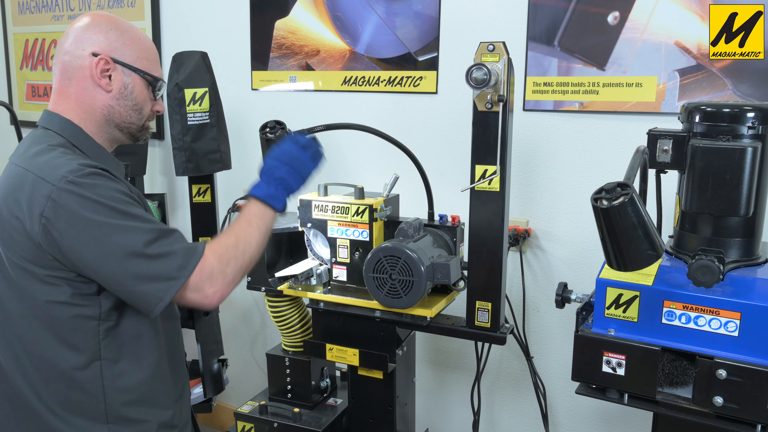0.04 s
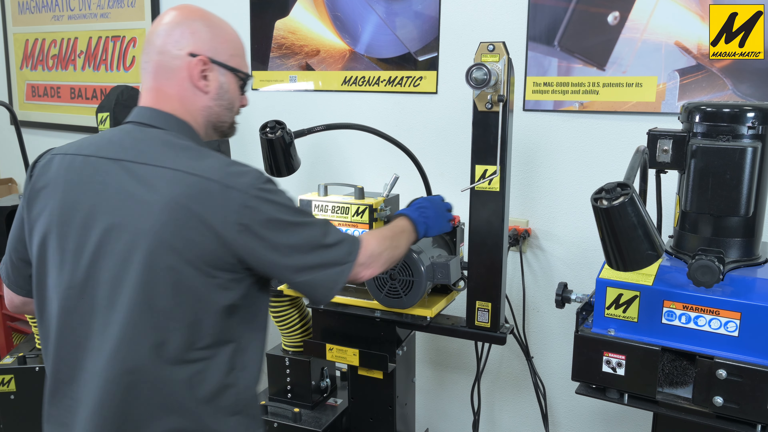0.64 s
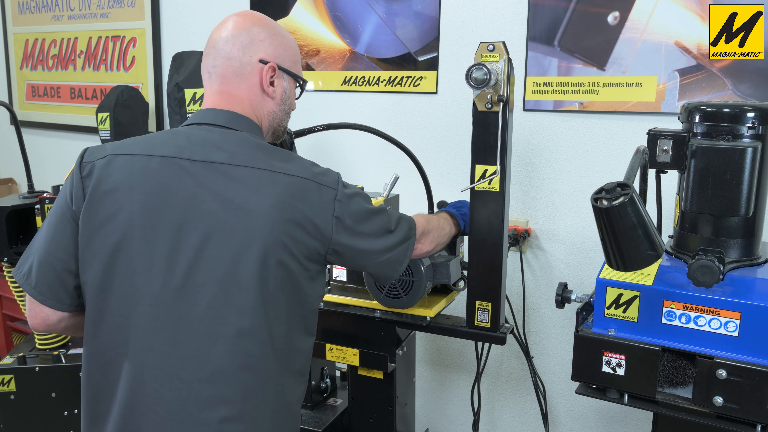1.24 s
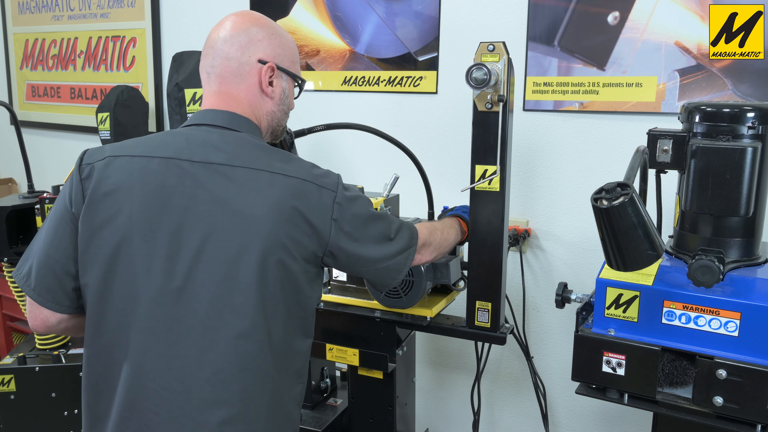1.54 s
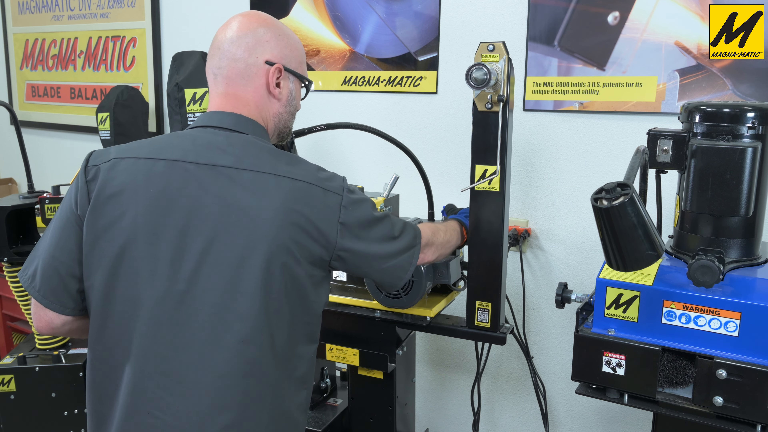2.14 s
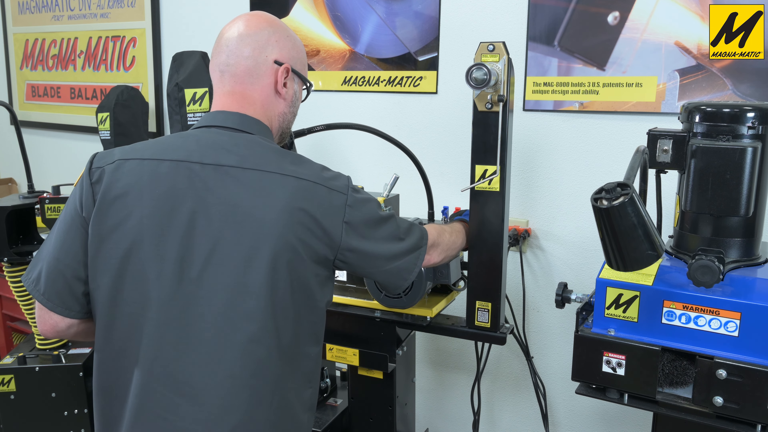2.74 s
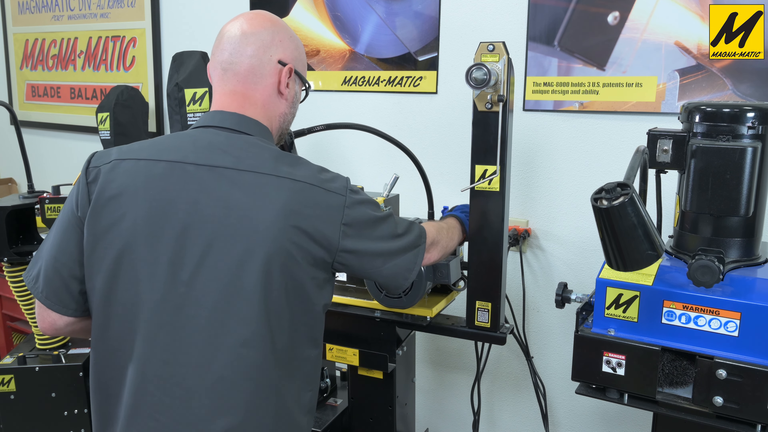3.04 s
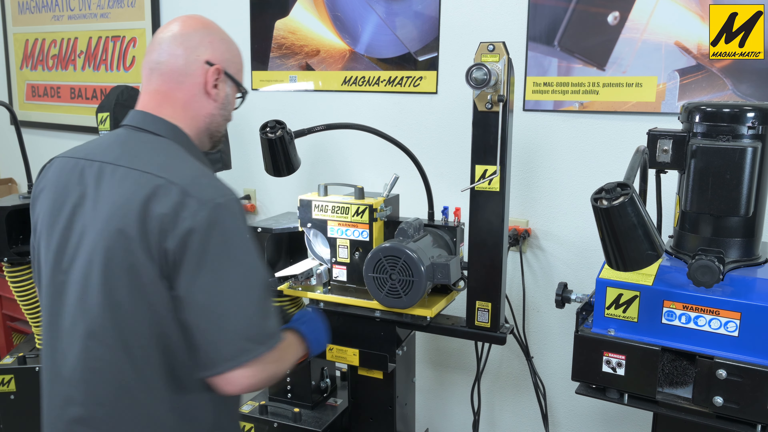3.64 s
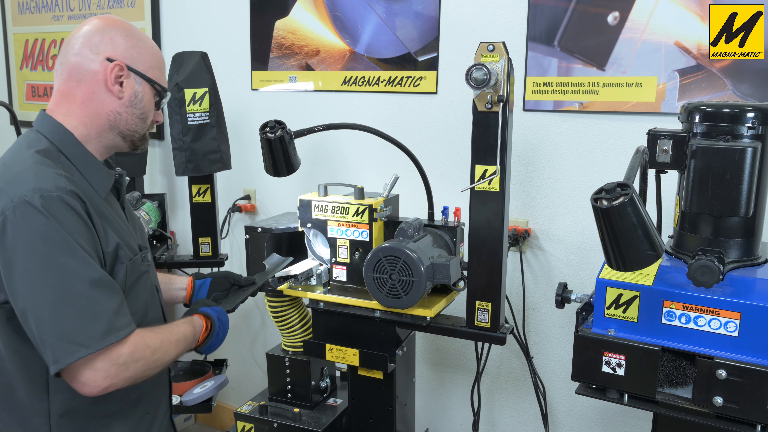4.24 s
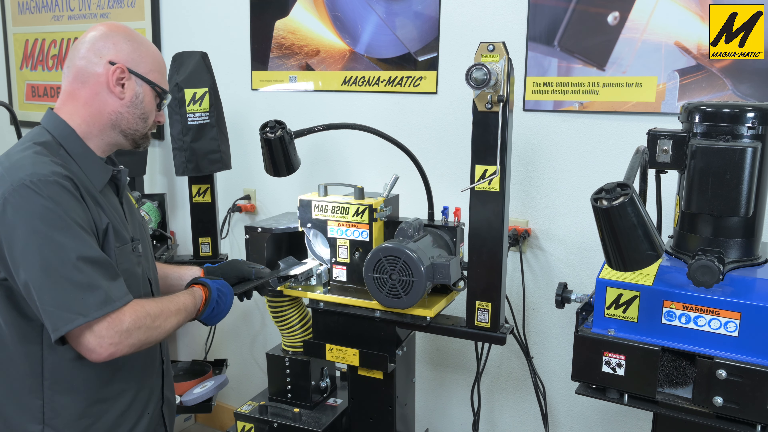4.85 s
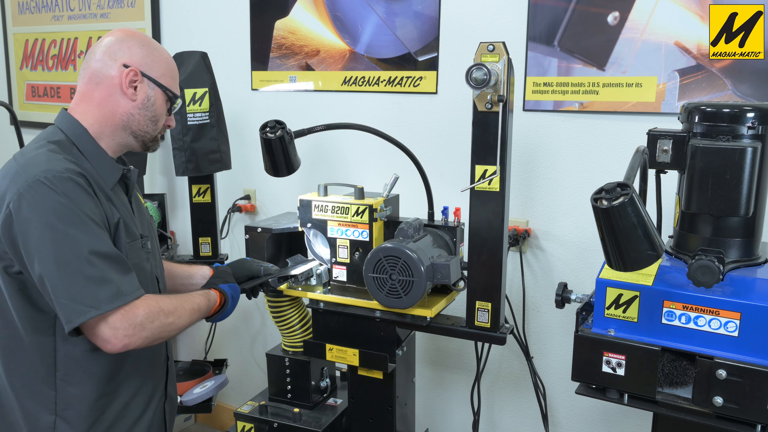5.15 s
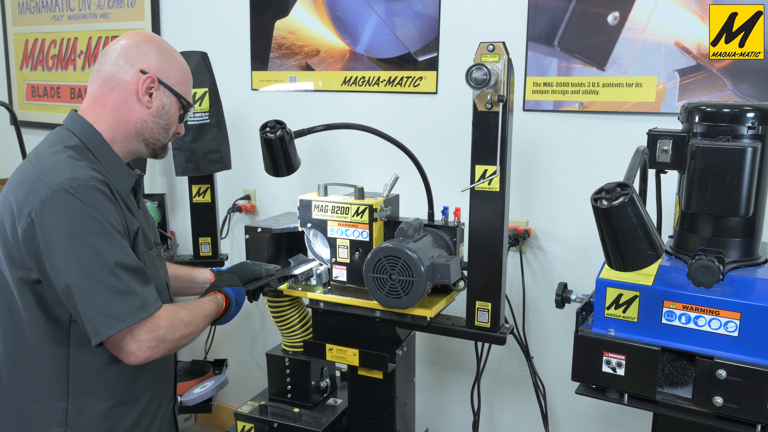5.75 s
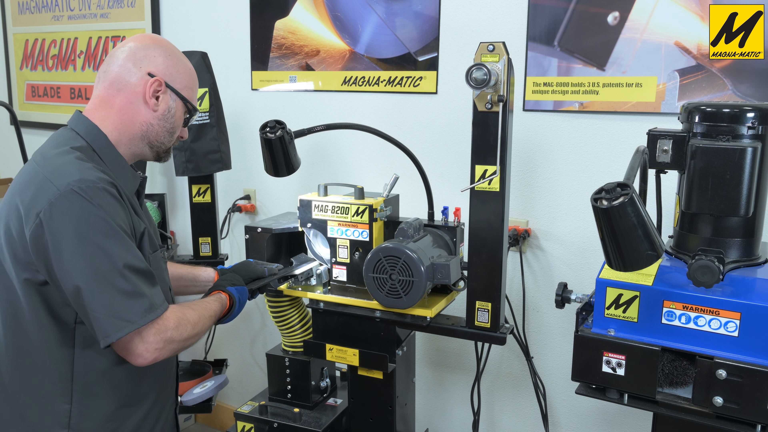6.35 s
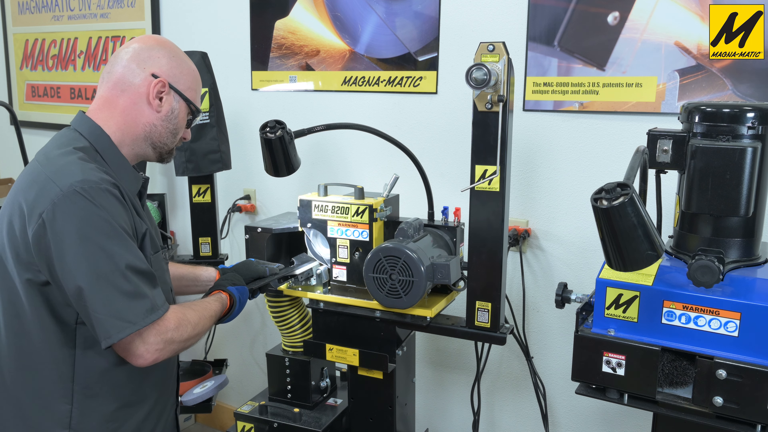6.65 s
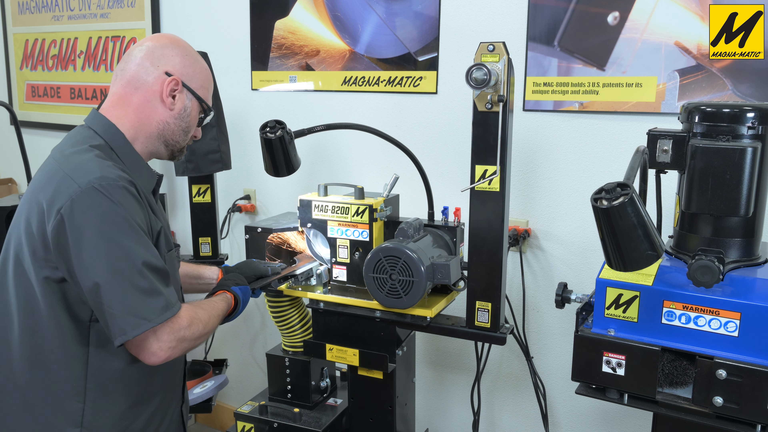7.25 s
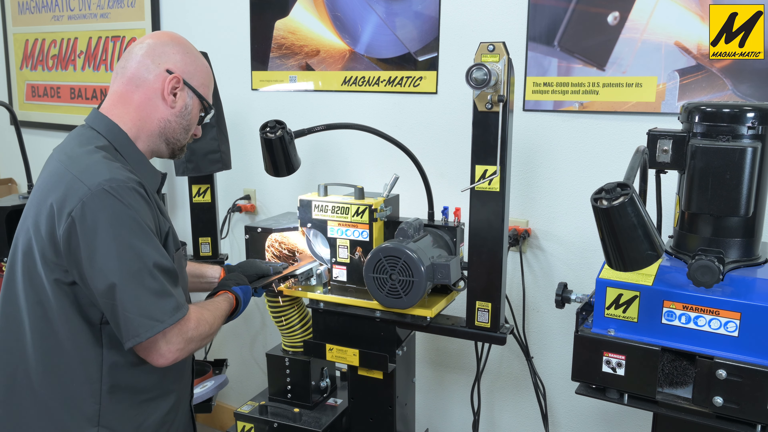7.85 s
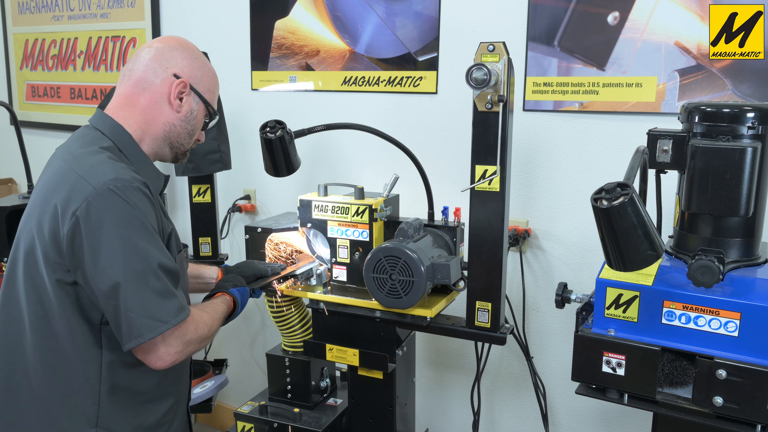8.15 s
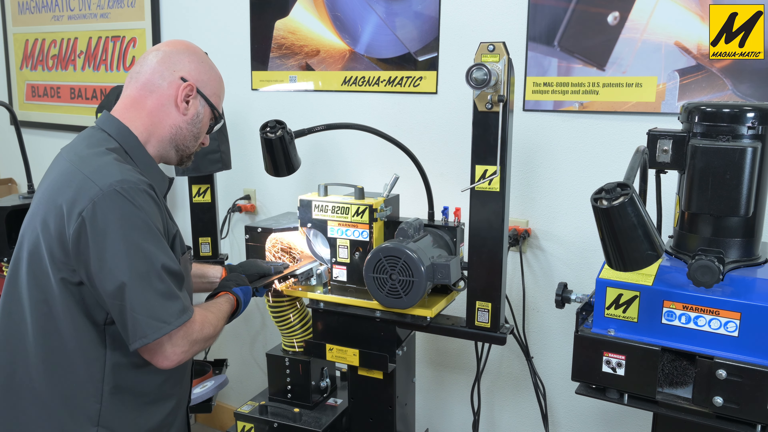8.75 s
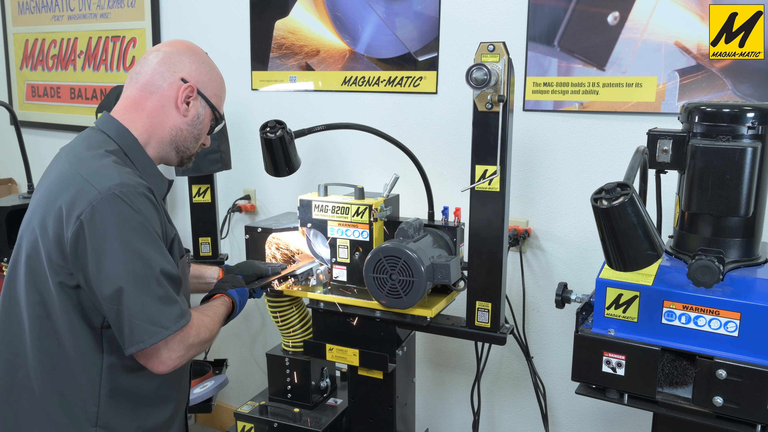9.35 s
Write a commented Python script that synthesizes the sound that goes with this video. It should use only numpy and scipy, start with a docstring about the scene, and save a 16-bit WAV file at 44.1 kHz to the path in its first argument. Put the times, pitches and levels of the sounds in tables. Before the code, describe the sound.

In a workshop, clothes rustle faintly, a shoe scuffs and a steel frame is lightly knocked. A switch clicks and a dust blower winds up with rushing air and a rising hum. A second click starts a belt grinder, which whirs and rattles. A steel blade skips on the belt, then bites with a loud, ringing hiss as the motor slows slightly. One fixed mono microphone hears it all.

```python
"""Clothes rustle and a sole scuffs as a man steps up to a belt grinder; one fixed mono mic in a workshop.
Knocks ring the steel frame and two switches click. A dust blower winds up, fan tones over rushing air,
then the grinder: its wheel and belt rattle in repeating loops and the two motors beat.
A steel blade first skips on the turning belt, then bites: the grit hisses, the blade rings,
the motor slows."""
import sys
import numpy as np
from scipy import signal
from scipy.fft import rfft, irfft, next_fast_len
from scipy.io import wavfile
from scipy.ndimage import uniform_filter1d, map_coordinates

SR = 44100
rng = np.random.default_rng(int(sys.argv[2]) if len(sys.argv) > 2 else 0)


def wav_record(signal):
    """Record a signal, one row per channel, as 16-bit PCM in the file named by sys.argv[1]."""
    frames = np.transpose(np.atleast_2d(signal))
    bounded = np.clip(frames, -1, 1)
    # unit amplitude maps onto the largest positive 16-bit level
    quanta = np.round(bounded * 32767).astype(np.int16)
    wavfile.write(sys.argv[1], SR, quanta)


N = 418509

# the still workshop at the mic: (frequency [Hz], level [dB])
ROOM_COLOUR = [(30, -24), (150, -11), (350, -4), (700, -18), (1500, -16), (5000, -18), (9500, -23),
               (15000, -31)]
# arm and body movements: (middle [s], half-length [s], folds [dB], swish [dB])
BODY_MOVES = [(0.123, 0.2, -64, -64.5), (0.62, 0.25, -68, -74), (0.94, 0.35, -72, -78),
              (1.504, 0.17, -71, -80)]
# cloth folding: (frequency [Hz], level [dB])
FOLD_COLOUR = [(29, -46), (50, -19), (93, -5), (316, 1.5), (501, -2.5), (612, -4.5), (895, -9), (1340, -10),
               (1540, -11.5), (6000, -25.5), (7800, -50), (13200, -120)]
# cloth swishing: (frequency [Hz], level [dB])
SWISH_COLOUR = [(1180, -29), (2000, -5), (2900, -5), (4630, -3), (10800, -5.5), (13900, -1.5),
                (15800, -5.5)]
# a shoe slides on the floor: (start [s], length [s], level [dB])
SHOE_SCUFFS = [(.56, 0.27, -78), (.78, 0.078, -56.5), (.89, 0.096, -66.5)]
# the sliding sole: (frequency [Hz], level [dB])
SOLE_COLOUR = [(180, -31), (300, -9), (323, -4), (439, -2), (572, -2), (643, -8), (985, -5.5), (2270, -1.5),
               (10000, -26.5), (13000, -56), (22000, -120)]
HUSH_S = 1.7  # rustle and frame ring stop short before the first switch

# ticks, knocks and switch clicks: (time [s], crack [dB], decay [s], brightness [Hz], frame ring [dB],
# low cut [Hz], place [0 frame to 1 switch box], ping of the struck part [Hz], ping [dB])
STRIKES = [(0.339, -59, 0.006, 1500, -80, 250, 0.1, 900, -64),
           (0.376, -65, 0.0035, 12000, -97, 250, 0.41, 350, -57),
           (0.465, -57, .008, 900, -95, 200, 0, 330, -59), (0.553, -57, .002, 4000, -87, 250, 0, 350, -55),
           (1.322, -57.5, 0.017, 7000, -84, 330, 0.084, 2670, -62),
           (1.333, -46, 0.013, 6000, -73, 335, 0.11, 2600, -44),
           (1.342, -60, 0.0038, 2600, -52, 258, 0.045, 2570, -44),
           (1.812, -36, 0.013, 7000, -57, 437, 1, 5080, -33.5),
           (2.466, -77, .002, 12000, -100, 1500, 1, 5080, -88),
           (2.8721, -38.5, 0.01, 8000, -74, 1190, 0.88, 3110, -38),
           (2.877, -47, 0.002, 5030, -60, 1200, 0.95, 3950, -44)]
# the crack of a strike: (frequency [Hz], level [dB])
CRACK_COLOUR = [(120, -37), (200, 2.5), (607, -15.5), (1430, -7), (1640, -15), (1900, -8), (2250, -14),
                (3120, -10), (3500, -15), (3850, -9), (4600, -12), (5110, -11), (5750, -10), (6900, -19.5),
                (14200, -23), (15500, -35.5)]
# steel frame: (frequency [Hz], struck on the frame [dB], struck at the switch box [dB], t60 [s])
FRAME_MODES = [(290, -9.5, 5, 0.47), (358, -10, -1, 0.9), (417, -0.5, -15, 0.66), (510, 1.5, 8, 0.23),
               (616, -16, 1, 0.4), (1350, -7, 3, 1), (1413, 2, 21, 0.066), (1880, 3, -8, 0.26),
               (2080, 18, -7, 0.1), (2620, 11, 2, 0.26), (3150, -11, -12, 0.9), (3677, -6, -2, .2),
               (4091, -3, -16, 0.23), (4888, -15, -1.5, .47), (5670, -10, 1, .4)]

BLOWER_ON_S, GRINDER_ON_S, IN_STEP_S = 1.81, 2.87, 5.35
# the blower winds up: (time [s], fan blades passing [Hz])
BLADE_PASS_RATE = [(1.81, 0), (2.05, 12), (2.4, 65), (2.6, 95), (2.8, 122), (2.94, 137), (3.18, 161),
                   (3.46, 185), (3.76, 206), (4.2, 231), (4.55, 235.3), (9.49, 235.3)]
# the duct lifts or swallows the fan's tones: (frequency [Hz], half-width [Hz], gain [dB])
DUCT_BANDS = [(172, 42, 6.5), (205.5, 7.7, 11), (218, 13, -8.5), (388, 7.8, -22), (445.4, 14.4, -7)]
# air rushing through the duct: (frequency [Hz], level [dB])
RUSH_COLOUR = [(29, -70), (50, -40), (182, -9.5), (210, -3.5), (230, -8.5), (276, -2.5), (326, 0),
               (406, -10.5), (451, -5.5), (475, 3), (520, -5.5), (576, 0), (746, -19), (1040, -22),
               (1100, -20.5), (1430, -40), (2420, -120)]
# blower housing: (frequency [Hz], width [Hz], level [dB])
HOUSING_MODES = [(1060, 176, 15), (1750, 330, -1.5), (2910, 120, -1), (3300, 250, -0.5)]
# rotor slots whine as the blower starts: (time [s], pitch [Hz])
SLOT_PITCH = [(1.81, 100), (2.3, 1050), (2.55, 1600), (2.7, 1900), (2.85, 2100), (2.95, 2150)]

# the grinder's motor winds up, then slows under load: (time [s], speed [turns/s])
GRINDER_SPEED = [(2.87, 0), (3.2, 29), (3.5, 48), (3.8, 59.2), (7.0, 59.2), (7.25, 58.65), (8.1, 58.2),
                 (9.49, 58.0)]
WHEEL_PER_MOTOR, WHEEL_TURNS_PER_BELT = 0.7758, 17
# the belt drags on its way up to speed: (frequency [Hz], level [dB])
DRAG_COLOUR = [(500, 7.5), (1000, 1), (1500, -4), (2400, -1), (3300, 6), (4300, -5.5), (6000, -13),
               (7200, -15), (9500, -14), (14500, -41)]
# the belt running: (frequency [Hz], level [dB])
RUN_COLOUR = [(410, -7), (700, -6), (957, -9), (1290, -8), (1610, -7), (2230, -12), (3060, -2.5),
              (3620, -8), (4290, -10.5), (6770, -12), (10300, -24.5), (12800, -25), (13800, -17.5),
              (14800, -27), (15800, -33)]
# wheel guard: (frequency [Hz], width [Hz], level [dB])
GUARD_MODES = [(1316, 110, -10), (1625, 17, -6), (2613, 25, 1), (2828, 5.3, 3), (3030, 140, 3),
               (3220, 160, -13), (3880, 62, -13)]
# the wheel rattles three times a turn: (place [turns], level [dB])
WHEEL_TAPS = [(.84, -8), (0, 0), (.18, -6)]
# the ring of those taps: (frequency [Hz], width [Hz], level [dB])
RATTLE_MODES = [(2854, 53, -13), (3038, 90, 7.5), (3234, 250, -5.5)]
# work rest, rung by the belt: (frequency [Hz], width [Hz], level [dB])
REST_MODES = [(3620, 25, -9), (4360, 105, 4), (4880, 94, -5.5), (5630, 280, 1), (6720, 390, -6.5),
              (7300, 110, -0.5), (7870, 71, -5), (8000, 56, -12), (8600, 100, -8)]
# bearing whines: (frequency at full speed [Hz], level [dB])
BEARING_WHINES = [(1287, -58), (1330, -55), (1561, -56), (1663, -58.5), (1841, -59), (2433, -62),
                  (2552, -58.5), (2794, -52), (2950, -52), (2993, -56), (3074, -59.5), (3628, -59),
                  (4409, -56), (4990, -85), (5523, -77), (7391, -72)]
# the motor sings under full pressure: (harmonic [cycles/turn], level [dB])
LOAD_HARMONICS = [(14, -63), (17, -53.5), (23, -61)]

# the blade touches the belt: (start [s], length [s], level [dB])
BLADE_TOUCHES = [(6.762, .075, -2), (6.915, .1, -1.5), (7.04, 2.5, 0)]
# the blade lifts off between high spots: (time [s], depth [dB])
LIFT_OFF = [(6.77, 14), (6.95, 14), (7.05, 8), (7.15, 2), (9.49, 1)]
DIP_S, DIP_FALL_S = 6.8, 0.048  # the machines' sound sinks as the blade is put on
# the blade's lower ring: (frequency [Hz], width [Hz], level [dB])
LOWER_MODES = [(1656, 20, -4), (1697, 51, 0.5), (1744, 24, 3.5), (1882, 55, 0)]
# the blade's upper ring: (frequency [Hz], width [Hz], level [dB])
UPPER_MODES = [(2104, 22, -13), (2159, 24, 0)]
# the blade's treble: (frequency [Hz], width [Hz], level [dB], loudest at [s], half-length [s])
TREBLE_MODES = [(3550, 55, -1.5, 8.4, 1.2), (4460, 120, -4, 7.65, 0.83), (4950, 110, 1, 7.9, 1.05),
                (5570, 90, 3, 7.03, 0.59), (5820, 63, 1.5, 7.46, 0.94), (6580, 110, 0, 7.54, .35),
                (6880, 150, 4, 6.9, 0.46), (7200, 53, 0, 7.6, 0.54), (8370, 140, -7, 6.7, 0.43)]
# grit biting steel: (frequency [Hz], level [dB])
BITE_COLOUR = [(2500, -6.5), (2800, -4.5), (3100, 6), (3400, -5.5), (3560, -2), (3750, -15), (3900, -6.5)]
# grit rasping: (frequency [Hz], level [dB])
RASP_COLOUR = [(3600, -23), (4400, 5.5), (7200, 8.5), (10000, -7.5), (12000, -15)]
# grit hissing: (frequency [Hz], level [dB])
HISS_COLOUR = [(3000, -50), (6000, -11), (8300, 5.5), (10300, 1), (12500, 6), (14200, 9.5), (15000, 1),
               (15800, -1)]
# lag at the mic of the sizzle reflected off the blade: (time [s], delay [ms])
REFLECTION_DELAY = [(7.2, 0.088), (8.1, 0.16), (8.5, .187), (9.3, 0.23)]


def from_db(db):
    """Decibels to gain."""
    return 10 ** (np.asarray(db) / 20)


def rms_one(x):
    """Scale to unit power."""
    return x / np.sqrt(np.mean(x ** 2) + 1e-20)


def seconds():
    """Time of every sample."""
    return np.arange(N) / SR


def since(s):
    """Seconds gone by since a moment; zero before it."""
    return np.maximum(seconds() - s, 0)


def ramp(start, rise):
    """From 0 to 1 in a straight line."""
    return np.minimum(since(start) / rise, 1)


def swell(middle, half_length):
    """A bell curve in time, peaking at 1."""
    return np.exp(-((seconds() - middle) / half_length) ** 2)


def curve(rows):
    """Join (time, value) points by straight lines."""
    return np.interp(seconds(), *np.transpose(rows))


def strokes(rows, attack_s, release_s):
    """Gain of a run of contacts, each with attack, hold and release."""
    return np.max([from_db(db) * ramp(s, attack_s) * np.exp(-since(s + length) / release_s)
                   for s, length, db in rows], axis=0)


def white():
    """Fresh white noise."""
    return rng.standard_normal(N)


def drift(rate_hz):
    """A random wander; rms 1."""
    knots = rng.standard_normal(4000)
    return rms_one(np.interp(seconds() * rate_hz, np.arange(len(knots)), knots))


def coloured(x, spectrum):
    """Give a steady sound a colour that falls away steeply past its ends; rms 1."""
    hz, db = np.transpose(sorted(spectrum))
    size = next_fast_len(N)
    octave, known = np.log2(np.fft.rfftfreq(size, 1 / SR) + 1), np.log2(hz)
    beyond = np.abs(octave - np.clip(octave, known[0], known[-1]))
    gain = from_db(np.interp(octave, known, db) - 20 * beyond)
    return rms_one(irfft(rfft(x, size) * gain, size)[:N])


def resonate(x, modes):
    """Parallel resonances, each (frequency [Hz], width [Hz], level [dB]); rms 1."""
    out = 0
    for hz, width, db in modes:
        r = np.exp(-np.pi * width / SR)
        feedback = [1, -2 * r * np.cos(2 * np.pi * hz / SR), r * r]
        out += from_db(db) * (1 - r * r) * signal.lfilter([1, 0, -1], feedback, x)
    return rms_one(out)


def low_pass(x, hz, order=2):
    """Causal low-pass."""
    return signal.sosfilt(signal.butter(order, hz, fs=SR, output="sos"), x + 1e-18)


def tone(cycles):
    """Sine of rms 1."""
    return np.sqrt(2) * np.sin(2 * np.pi * cycles)


def turns(speed):
    """Turns made, counted from a moment when both motors are in step."""
    count = np.cumsum(speed) / SR
    return count - count[int(IN_STEP_S * SR)]


def with_speed(speed, db, db_per_octave):
    """Gain that grows as a power of speed, reaching `db` at full speed."""
    return from_db(db + db_per_octave * np.log2(speed / speed.max() + 1e-9))


def surface(laps, size):
    """A closed random surface with `size` bumps, met again on every lap."""
    spectrum = [1, 1j] @ rng.standard_normal((2, size // 2 + 1))
    spectrum[0] = 0
    return rms_one(map_coordinates(irfft(spectrum, size), [laps % 1 * size], order=3, mode="grid-wrap"))


def high_spot(laps, depth_db):
    """A swell once per turn, at constant mean power."""
    gain = from_db(depth_db * np.cos(2 * np.pi * laps) / 2)
    return gain / np.sqrt(uniform_filter1d(gain ** 2, size=2205))


def once_a_turn(laps):
    """One click per turn; rms 1."""
    return rms_one(np.diff(np.floor(laps), prepend=np.floor(laps[0])))


def until_hush():
    """1 until the short hush before the first switch, then 0."""
    return 1 - ramp(HUSH_S, 0.008)


def pressure(from_s=7.04, rise_s=0.37):
    """How hard the hand leans on the blade, 0-1."""
    return 1 - np.exp(-since(from_s) / rise_s)


def under_hand(db, light_loss_db, slide_db_per_s, slide_from_s=6.84):
    """Gain of a grinding sound as the hand touches, presses and draws the edge along the belt."""
    touch = strokes(BLADE_TOUCHES, attack_s=0.01, release_s=0.046)
    return touch * from_db(db - light_loss_db * (1 - pressure()) + slide_db_per_s * since(slide_from_s))


def room_tone(db=-91):
    """The workshop's faint, steady bed of noise."""
    return from_db(db) * coloured(white(), ROOM_COLOUR)


def man(still_folds_db=-78, still_swish_db=-82.5, fold_flutter_db=1.5, crinkle_db=2):
    """Cloth folds and swishes with each movement, and a sole slides on the floor."""
    folds, swish = from_db(still_folds_db), from_db(still_swish_db)
    for s, half_length, folds_db, swish_db in BODY_MOVES:
        move = swell(s, half_length)
        folds = np.hypot(folds, from_db(folds_db) * move)
        swish = np.hypot(swish, from_db(swish_db) * move)
    cloth = folds * coloured(white() * from_db(fold_flutter_db * drift(61.7)), FOLD_COLOUR)
    cloth += swish * coloured(white() * from_db(crinkle_db * drift(250)), SWISH_COLOUR)
    sole = strokes(SHOE_SCUFFS, attack_s=0.023, release_s=0.052) * coloured(white(), SOLE_COLOUR)
    return (cloth + sole) * until_hush()


def knocks_and_switches(tail_db=-16, tail_t60=0.54, tail_hz=6200, ping_t60=0.036):
    """Each strike cracks, pings, leaves a short room tail and sets the steel frame ringing."""
    crack = coloured(white(), CRACK_COLOUR)
    tail = low_pass(coloured(white(), CRACK_COLOUR), tail_hz)
    out, age = np.zeros(N), seconds()[:SR]
    for s, db, decay, bright_hz, ring_db, low_cut_hz, place, ping_hz, ping_db in STRIKES:
        span = slice(int(s * SR), int(s * SR) + SR)
        burst = crack[span] * np.exp(-age / decay) + from_db(tail_db - 60 * age / tail_t60) * tail[span]
        click = from_db(db) * low_pass(burst, bright_hz, order=1)
        click += from_db(ping_db - 60 * age / ping_t60) * np.sin(2 * np.pi * ping_hz * age)
        frame = 0
        for hz, frame_db, box_db, t60 in FRAME_MODES:
            mode_db = frame_db + place * (box_db - frame_db)
            frame += from_db(mode_db - 60 * age / t60) * np.sin(2 * np.pi * hz * age)
        # a duller blow is a longer push: it favours the low modes
        click += from_db(ring_db) * low_pass(frame, bright_hz / 4, order=1)
        if s < HUSH_S:
            click *= until_hush()[span]
        # small parts radiate no bass
        out[span] += signal.sosfilt(signal.butter(4, low_cut_hz, "high", fs=SR, output="sos"), click)
    return out


def duct(hz):
    """Gain of the duct for a fan tone sweeping through its bands."""
    return from_db(sum(db * np.exp(-((hz - centre) / width) ** 2) for centre, width, db in DUCT_BANDS))


def fan(speed):
    """Passing fan blades sound three harmonics, unsteady until up to speed."""
    blades, share = turns(speed), speed / speed.max()
    first = with_speed(speed, db=-49.5, db_per_octave=25.5)
    second = with_speed(speed, db=-46 - 1.2 * pressure(), db_per_octave=21.5)
    third = second * from_db(2 - 20 * share ** 3)  # fades as the fan gathers speed
    tones = first * duct(speed) * tone(blades) + second * duct(2 * speed) * tone(2 * blades)
    tones += third * tone(3 * blades)
    return tones * from_db(3 * np.sqrt(1 - share) * drift(35))


def blower_motor(speed, hum_hz=120, hum_db=-83, both_motors_db=-71, start_db=-67):
    """Mains hum grows when the grinder joins; a buzz and a rising rotor-slot whine mark the start."""
    mains = hum_hz * seconds()
    hum_level = from_db(hum_db + (both_motors_db - hum_db) * ramp(GRINDER_ON_S, 0.51))
    hum = ramp(BLOWER_ON_S, 0.13) * hum_level * tone(mains)
    buzz = resonate(0.48 * surface(mains, size=360) + white(),
                    [(376, 79, -7.5), (480, 50, -1), (540, 22, 10.5), (590, 41, -3.5), (746, 50, -2.5)])
    slot_band = rms_one(low_pass(white(), 115, order=3) * tone(turns(curve(SLOT_PITCH))))
    whine = np.minimum(speed / 105, 1) ** 7.5 * slot_band
    starting = np.interp(seconds(), [BLOWER_ON_S, 1.86, 2.76, 2.92], [0, 1, 1, 0])
    return hum + starting * from_db(start_db) * (low_pass(buzz, 770) + whine)


def blower(whirr_db=-67, dip_db=4):
    """Air rushes through the duct under the fan and its motor, and the housing whirrs."""
    speed = curve(BLADE_PASS_RATE)
    rush = with_speed(speed, db=-44.5, db_per_octave=12) * coloured(white(), RUSH_COLOUR)
    fan_and_motor = fan(speed) + blower_motor(speed)
    housing = rms_one(low_pass(resonate(white(), HOUSING_MODES), 3080, order=6))
    whirr = from_db(whirr_db) * (speed / 120) ** 2.24 * housing
    return from_db(-dip_db * ramp(DIP_S, DIP_FALL_S)) * (rush + fan_and_motor + whirr)


def belt_drag(speed, grain_db=2):
    """The belt drags with a gritty whirr as long as the motor gains speed."""
    pull = np.maximum(uniform_filter1d(np.gradient(speed), size=8820), 0)
    grains = coloured(white() * from_db(grain_db * drift(400)), DRAG_COLOUR)
    return pull / pull.max() * with_speed(speed, db=-34.5, db_per_octave=15) * grains


def wheel_and_belt(speed, looseness=0.56):
    """Wheel, motor and belt each repeat their own roughness; the wheel knocks the guard once a turn."""
    motor = turns(speed)
    wheel = motor * WHEEL_PER_MOTOR + 0.2
    belt = wheel / WHEEL_TURNS_PER_BELT
    loops = 0.55 * surface(wheel, 960) + 0.49 * surface(motor, 745) + 0.97 * surface(belt, 16300)
    rough = rms_one(loops) + 0.4 * white()
    run = coloured(rough * high_spot(wheel, depth_db=1), RUN_COLOUR)
    knocks = 0.45 * once_a_turn(wheel) + (0.8 * rough + 0.55 * white()) * high_spot(wheel - 0.05, 11)
    guard = resonate(low_pass(knocks, 5700), GUARD_MODES)
    taps = sum(from_db(db) * once_a_turn(wheel - place) for place, db in WHEEL_TAPS)
    rattle = resonate(taps * (1 + looseness * white()), RATTLE_MODES)
    work_rest = resonate((rough + white()) * high_spot(wheel, depth_db=5), REST_MODES)
    return (with_speed(speed, db=-43, db_per_octave=22) * run
            + with_speed(speed, db=-52, db_per_octave=29) * guard
            + with_speed(speed, db=-53, db_per_octave=29) * rattle
            + with_speed(speed, db=-56, db_per_octave=22) * work_rest)


def bearings(speed, waver_db=1, load_db=8):
    """Fine wavering whines that follow the motor's speed and weaken under load."""
    travel = turns(speed / speed.max())
    whines = sum(from_db(db + waver_db * drift(7.1)) * tone(hz * travel + rng.random())
                 for hz, db in BEARING_WHINES)
    return with_speed(speed, db=-3 - load_db * pressure(), db_per_octave=45) * whines


def motor_whine(speed, poles=8, build_db=4, build_s=4.6, load_db=48):
    """The grinder's poles whine, building after the start; pressure on the blade stifles them."""
    loss_db = build_db * (1 - ramp(GRINDER_ON_S, build_s)) + load_db * pressure()
    return with_speed(speed, db=-47.5 - loss_db, db_per_octave=78) * tone(poles * turns(speed))


def grinder(speed, dip_db=2.5, return_db_per_s=1.4):
    """The running machine dips as the blade is put on, then grows again; its motor sings under load."""
    running = wheel_and_belt(speed) + bearings(speed) + motor_whine(speed)
    dip = from_db(return_db_per_s * since(DIP_S) - dip_db * ramp(DIP_S, DIP_FALL_S))
    load_tones = sum(from_db(db) * tone(harmonic * turns(speed)) for harmonic, db in LOAD_HARMONICS)
    return dip * running + pressure() ** 4 * load_tones


def blade_ring(cuts, wheel, motor, node_s=7.64, node_every_s=1.15, node_db=9.5, swell_db=5):
    """Grit and the wheel's kicks ring the blade; its modes take turns as the contact passes nodes."""
    at_node = np.cos(np.pi * (seconds() - node_s) / node_every_s) ** 4
    kicks = once_a_turn(wheel + 0.25)
    lower = resonate(kicks + 1.6 * cuts, LOWER_MODES)
    upper = from_db(-node_db * at_node) * resonate(kicks + 0.63 * cuts, UPPER_MODES)
    sing = from_db(swell_db * at_node) * tone(28 * motor)  # one low mode locks onto the motor's turning
    ring = (under_hand(db=-47.5, light_loss_db=5.4, slide_db_per_s=0.9) * lower
            + under_hand(db=-46, light_loss_db=3, slide_db_per_s=0.98) * upper
            + under_hand(db=-52.5, light_loss_db=1, slide_db_per_s=1.8) * sing)
    return ring * high_spot(wheel, depth_db=4) * high_spot(motor, depth_db=2)


def blade_treble(scrape):
    """Each high mode swells and fades as the contact slides along the edge."""
    modes = sum(from_db(db) * swell(s, half_length) * resonate(scrape, [(hz, width, 0)])
                for hz, width, db, s, half_length in TREBLE_MODES)
    return under_hand(db=-51, light_loss_db=3, slide_db_per_s=0) * modes


def sizzle(scrape, reflected_share=0.22):
    """Rasp and hiss reach the mic directly and off the sliding blade, so a hollow sweeps down."""
    rasp = under_hand(db=-44.5, light_loss_db=4, slide_db_per_s=-5) * coloured(scrape, RASP_COLOUR)
    hiss = under_hand(db=-45, light_loss_db=-0.45, slide_db_per_s=-0.27) * coloured(scrape, HISS_COLOUR)
    direct = rasp + hiss
    read_at = np.arange(N) - curve(REFLECTION_DELAY) * SR / 1000
    return direct + reflected_share * map_coordinates(direct, [read_at], order=3)


def grinding(speed, wheel_slip=0.006, flutter_db=0.5, grit_db=3, chatter_db=3):
    """Countless grit cuts hiss and ring the blade; at first only a high spot touches, once a turn."""
    motor = turns(speed)
    wheel = turns(speed * WHEEL_PER_MOTOR * (1 - wheel_slip * pressure() ** 4))
    contact = high_spot(motor - 0.85, curve(LIFT_OFF)) * from_db(flutter_db * drift(45))
    cuts = rms_one(white() * from_db(grit_db * white()) * contact)
    shake = rms_one(surface(wheel, 960) + surface(motor, 745))
    bite = coloured(shake + 0.27 * cuts, BITE_COLOUR)
    bite *= under_hand(db=-39.5, light_loss_db=13, slide_db_per_s=-1.9)
    scrape = cuts + 0.5 * shake * contact
    chatter = (bite + blade_treble(scrape)) * high_spot(wheel, chatter_db)
    return blade_ring(cuts, wheel, motor) + chatter + sizzle(scrape)


def scene():
    """The whole workshop from one mic position, in mono."""
    speed = curve(GRINDER_SPEED)
    approach = room_tone() + man() + knocks_and_switches()
    machines = blower() + grinder(speed) + belt_drag(speed)
    return (approach + machines + grinding(speed))[None]


def record(dry, cutoff_hz=15800):
    """The mic signal's top is cut steeply."""
    return signal.sosfilt(signal.ellip(12, 0.1, 80, cutoff_hz, fs=SR, output="sos"), dry)


dry = scene()
out = record(dry)
wav_record(out)
```